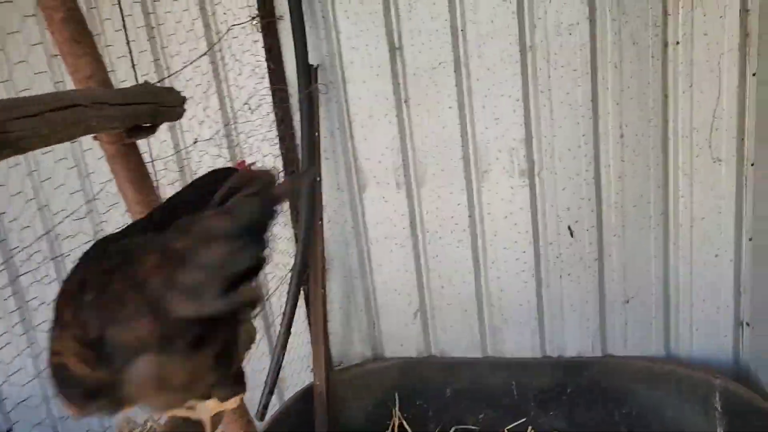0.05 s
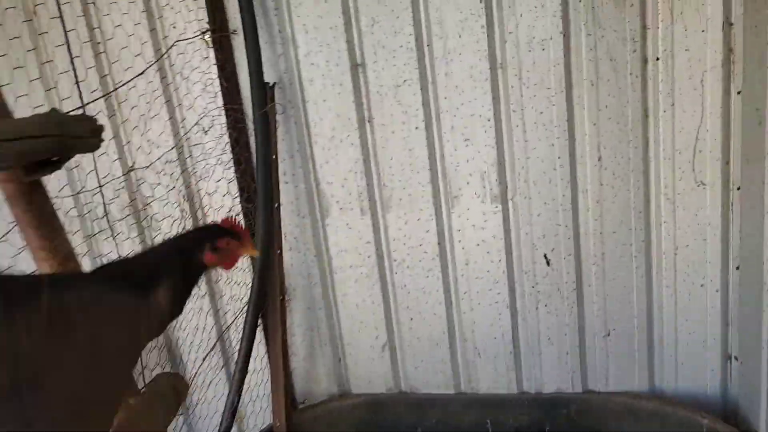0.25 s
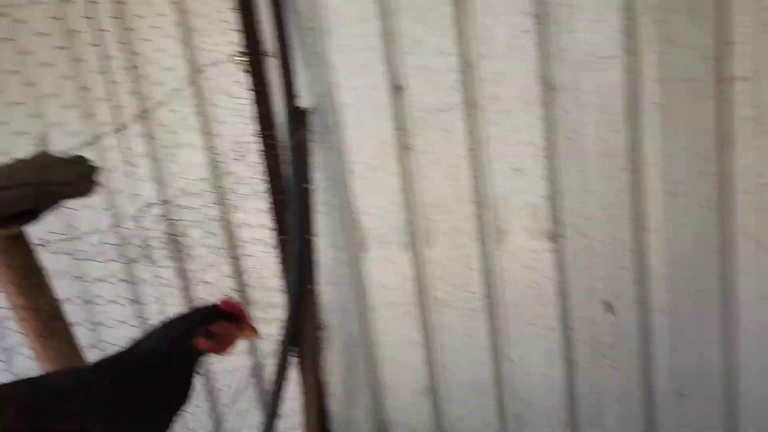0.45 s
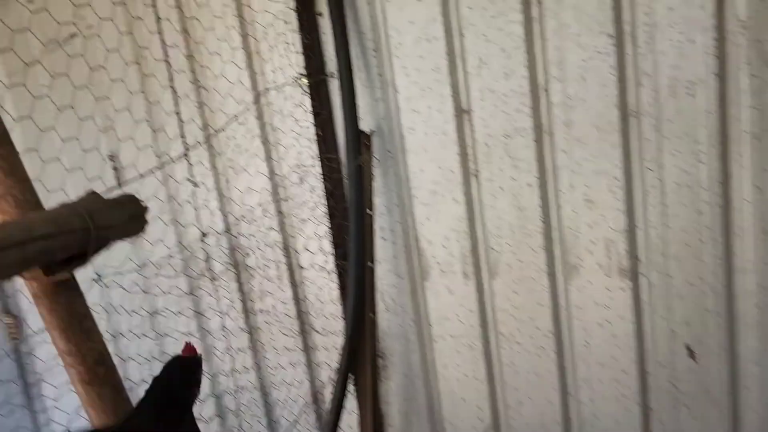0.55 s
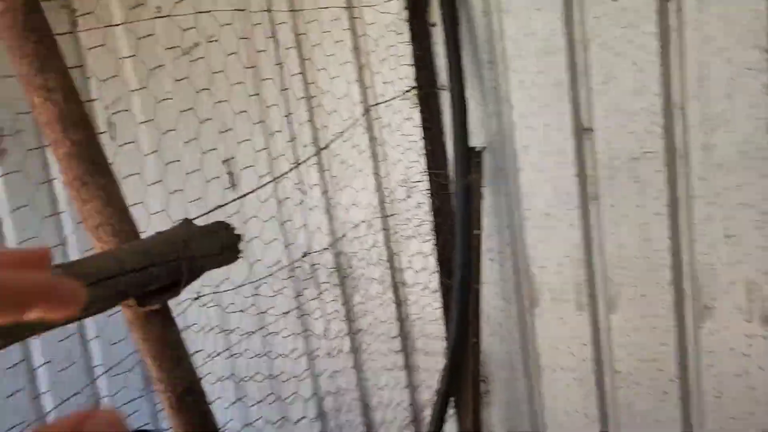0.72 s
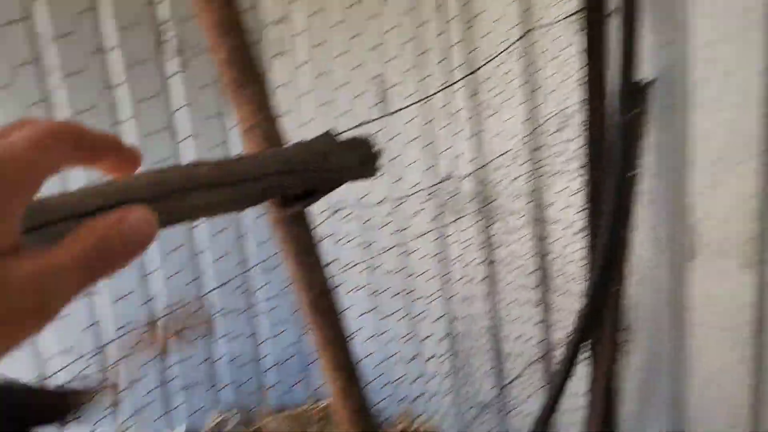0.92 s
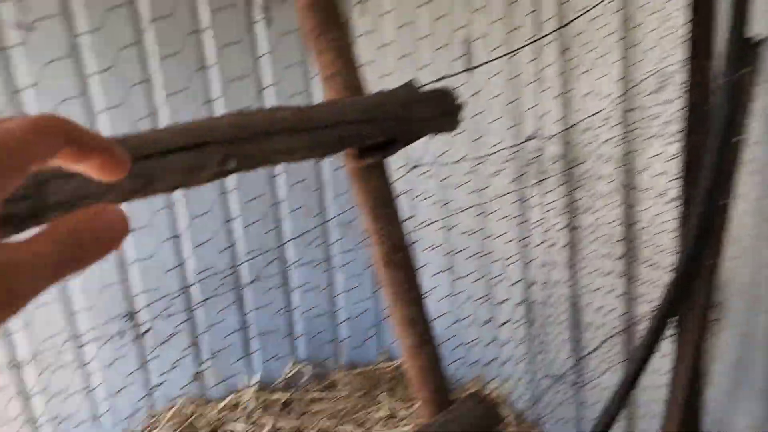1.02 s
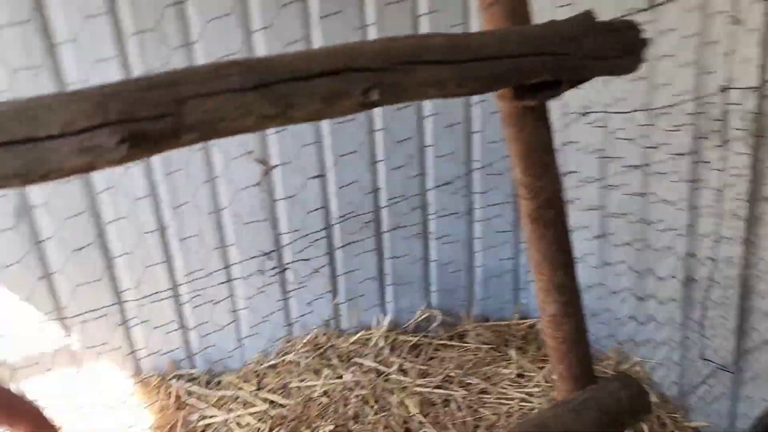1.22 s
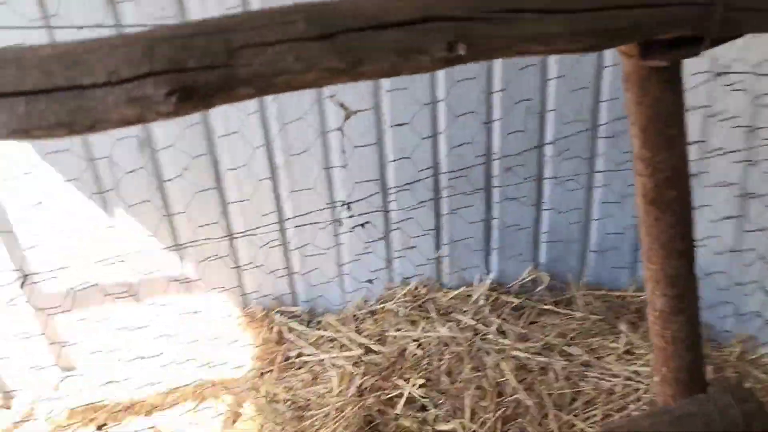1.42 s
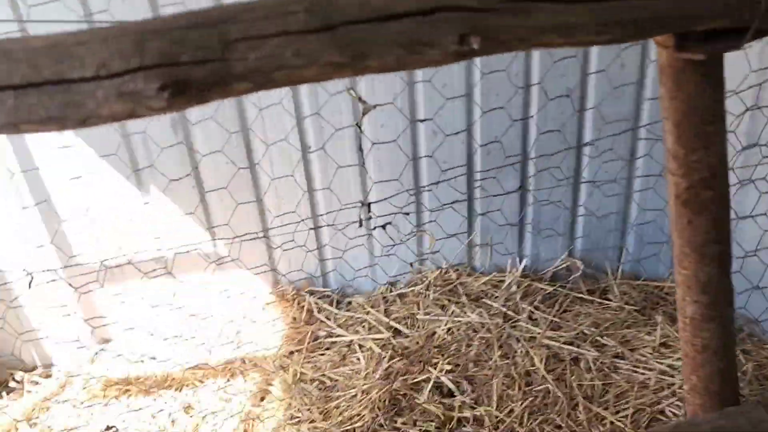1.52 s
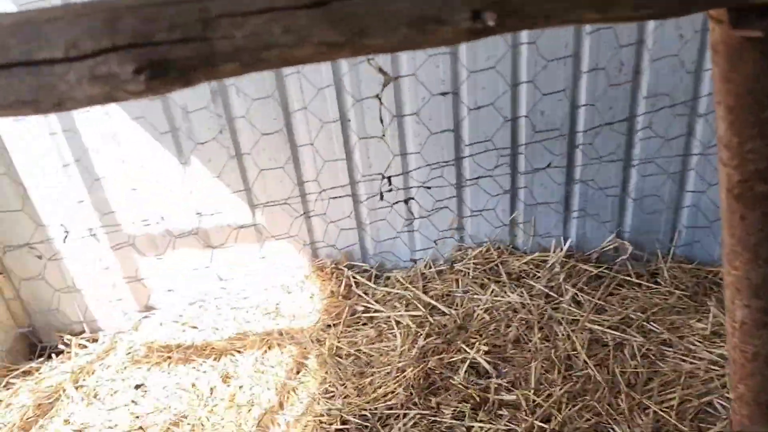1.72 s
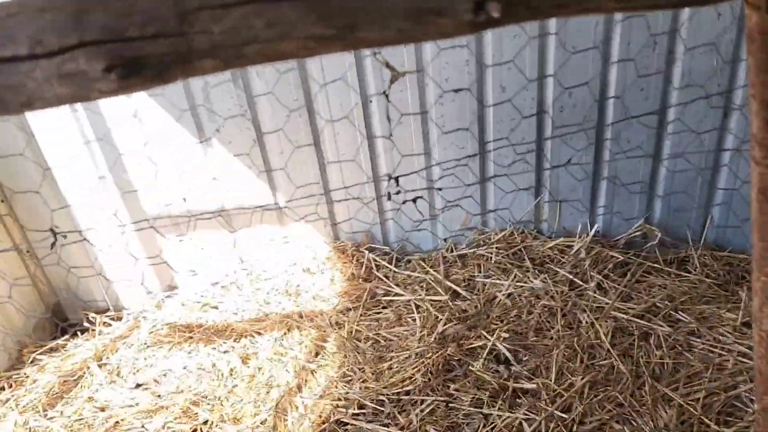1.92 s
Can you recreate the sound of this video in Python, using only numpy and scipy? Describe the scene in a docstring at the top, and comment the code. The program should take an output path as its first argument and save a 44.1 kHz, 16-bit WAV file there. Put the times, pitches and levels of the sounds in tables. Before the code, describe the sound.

A hen gives a faint whine, hoarse clucks from 0.2 seconds and one short squawk at 0.5. From 0.8 to 1.1 seconds she scuffles down with wing slaps, claw scratches, snapping stalks and a few knocks on a wooden perch, clucking twice more as it starts. Dry straw rustles throughout in the small metal pen, with low air and handling rumble on the close microphone, fading by 2 seconds.

```python
"""A thin whine, then hoarse clucks and one squawk: a hen is shooed off her straw nest in a small metal pen.
Her syrinx buzzes through throat and beak, and the sheet-metal walls add a short ring.
Straw and feathers rustle throughout, while moving air and handling rumble on the close microphone.
Her wings slap and her claws scratch in bursts of crackle as she jumps down on the left;
dry stalks snap and a knocked wooden perch rings."""
import sys
import numpy as np
from scipy import signal
from scipy.fft import rfft, irfft
from scipy.io import wavfile

SR = 44100
rng = np.random.default_rng(int(sys.argv[2]) if len(sys.argv) > 2 else 0)


def to_wav(s):
    """Save 16-bit WAV."""
    ch = np.atleast_2d(s).T  # columns
    pcm = np.round(np.clip(ch, -1, 1) * 32767)  # PCM
    wavfile.write(sys.argv[1], SR, pcm.astype(np.int16))


N = 85995
T = np.arange(N) / SR


def amp(db):
    """Decibels to gain."""
    return 10 ** (np.asarray(db) / 20)


def unit(x):
    """Scale to rms 1."""
    return x / np.sqrt(np.mean(x ** 2) + 1e-18)


def fader(points):
    """Gain that rides through (time [s], level [dB]) points."""
    return amp(np.interp(T, *np.array(points).T))


def colour(points, hz):
    """Gain at hz of an EQ curve drawn through (frequency [Hz], level [dB]) points."""
    f, db = np.array(points).T
    return amp(np.interp(np.log(np.maximum(hz, 1)), np.log(f), db))


def bell(hz, centre, width):
    """Bell of a resonance, 1 at its centre."""
    return 1 / (1 + ((hz - centre) / width) ** 2)


def eq(x, gain):
    """Minimum-phase filter from a function that gives gain by frequency."""
    size = 4096
    cepstrum = irfft(np.log(gain(np.fft.rfftfreq(size, 1 / SR)) + 1e-7))
    cepstrum[1:size // 2] *= 2
    cepstrum[size // 2 + 1:] = 0
    return signal.fftconvolve(x, irfft(np.exp(rfft(cepstrum))))[:N]


def wobble(rate_hz):
    """Random drift with rms 1."""
    return unit(np.interp(T * rate_hz, np.arange(N), rng.standard_normal(N)))


def grains(spread_db, grain_samples=14):
    """Dense crackle: tiny noise grains of uneven level."""
    noise = rng.standard_normal(N)
    gains = amp(spread_db * rng.standard_normal(N // grain_samples + 1))
    return unit(noise * np.repeat(gains, grain_samples)[:N])


def wide(make, side_db):
    """Stereo from one draw for the mid and another for the side."""
    return make() + amp(side_db) * make() * np.array([[1], [-1]])


def swell(start, length):
    """A half-sine rise and fall."""
    return np.sin(np.pi * np.clip((T - start) / length, 0, 1))


def hen():
    """The syrinx buzzes, unsteady and raspy when hoarse, through the throat and a beak resonance."""
    # (start [s], length [s], pitch [Hz], level [dB], roughness [0-1], beak resonance [Hz], its lift [dB])
    calls = [(-.04, .19, 489.4, -45.5, 0.1, 1000, 10.5), (0.203, 0.14, 492.4, -34.5, 0.4, 1070, 16),
             (0.27, 0.058, 504, -27.5, 0.87, 1360, 20), (0.309, 0.038, 502.3, -39, 0.73, 496, 22),
             (0.438, 0.072, 501, -30.5, 0.71, 1190, 15.5), (0.52, 0.032, 570.2, -14.5, 0.31, 1574, 11),
             (.742, 0.042, 456.6, -26.5, 0.14, 1710, -2), (.866, 0.061, 449, -23.5, 0.2, 1250, 25)]
    # throat formants (frequency [Hz], level [dB])
    throat = [(250, -35), (450, 0.5), (600, -0.5), (800, -0.5), (1150, -9), (1400, -1.5), (2100, 6.5),
              (3000, -8), (4500, -16), (8000, -45), (16000, -72)]
    arch, sag, jitter = .025, .018, .116  # shares of the pitch; jitter at full roughness
    beak_width_hz = 280
    out = np.zeros(N)
    for start, length, hz, db, rough, beak_hz, lift_db in calls:
        progress = np.clip((T - start) / length, 0, 1)
        bend = arch * (np.sin(np.pi * progress) - np.pi / 4) - sag * (progress - .5)
        pitch = hz * (1 + bend + jitter * rough * wobble(rate_hz=255.8))
        phase = 2 * np.pi * np.cumsum(pitch) / SR
        voiced = (progress > 0) & (progress < 1)
        buzz = np.zeros(N)
        buzz[voiced] = unit(np.cos(np.outer(phase[voiced], np.arange(1, 21))).sum(axis=1))
        rasp = 1.5 * rough * rng.standard_normal(N) * (1 + np.cos(phase))  # pulses with the buzz
        voice = (buzz + rasp) * swell(start, length)
        call = eq(voice, lambda f: colour(throat, f) * amp(lift_db * bell(f, beak_hz, beak_width_hz)))
        out += amp(db) * unit(call) * np.sqrt(length * SR / N)
    return np.array([out, out])


def pen(x, wet_db, t60_s):
    """Sound from the left reaches the left channel first; the metal walls add a short, dense ring."""
    left_lead_s, damping_hz = .00027, 10200
    late_right = np.pad(x[1], (int(left_lead_s * SR), 0))[:N]
    fade_in = np.clip(T / .00063 - .5, 0, 1)
    out = []
    for direct in (x[0], late_right):
        tail = rng.standard_normal(N) * amp(-60 * T / t60_s) * fade_in
        tail = eq(tail / np.linalg.norm(tail), lambda f: bell(f, 0, damping_hz))
        out.append(direct + amp(wet_db) * signal.fftconvolve(direct, tail)[:N])
    return np.array(out)


def straw():
    """Straw crunches and feathers swish, fluttering a little; a few stalks slide and squeak."""
    # tone of the rustle (frequency [Hz], level [dB])
    tone = [(300, -31), (700, 0), (2300, 2.5), (5000, 0.5), (6200, -3.5), (8000, 0.5), (9800, -9),
            (11700, 1.5), (13000, -6.5), (16000, -11)]
    # crunch below the crossover (time [s], relative level [dB])
    crunch_ride = [(0, -55), (.3, -38), (.63, -56), (.8, -37.5), (1.15, -42.5), (1.35, -41.5),
                   (1.65, -49.5), (1.95, -54.5)]
    # swish above the crossover (time [s], relative level [dB])
    swish_ride = [(0, -54), (.11, -53.5), (.23, -36), (.35, -42.5), (.43, -39.5), (.47, -49.5), (.62, -50),
                  (.76, -43), (.8, -43), (.97, -33.5), (1.08, -45.5), (1.32, -40), (1.38, -51),
                  (1.455, -51.5), (1.49, -42), (1.55, -47), (1.73, -48), (1.8, -57.5), (1.95, -50.5)]
    # sliding stalks (start [s], length [s], squeak centre [Hz], level [dB])
    slides = [(1.288, 0.019, 8260, -30.5), (1.302, 0.089, 2450, -37.5), (1.789, 0.026, 5240, -48)]
    crossover_hz, flutter_db = 3840, .8

    def crackle(gain):
        return wide(lambda: eq(grains(spread_db=3), gain), side_db=1.0)

    def lows(f):
        return 1 / np.sqrt(1 + (f / crossover_hz) ** 10)

    crunch = crackle(lambda f: colour(tone, f) * lows(f)) * fader(crunch_ride)
    swish = crackle(lambda f: colour(tone, f) * np.sqrt(1 - lows(f) ** 2)) * fader(swish_ride)
    out = 2 * (crunch + swish) * amp(flutter_db * wobble(rate_hz=43.7))
    for start, length, hz, db in slides:
        out += amp(db) * swell(start, length) * unit(crackle(lambda f: bell(f, hz, width=850)))
    return out


def microphone_rumble():
    """Air buffets the microphone and the hand rubs on its case."""
    # buffeting air (frequency [Hz], level [dB])
    air_tone = [(20, -26), (38, 2), (60, 3.5), (90, -0.5), (116, 5.5), (150, -8), (250, -17), (4000, -100)]
    # its rise and fall (time [s], level [dB])
    air_ride = [(0, -53), (.18, -55), (.23, -37.5), (.42, -35), (.57, -33), (.68, -41.5), (.9, -25.5),
                (1.1, -34), (1.45, -31.5), (1.6, -34), (1.95, -38.5)]
    # rubbed case (frequency [Hz], level [dB])
    case_tone = [(60, -9), (160, -0.5), (205, 3), (245, -2), (290, 1), (450, -1), (600, -7.5), (800, -14),
                 (1500, -34), (5000, -30)]
    # its rise and fall (time [s], level [dB])
    hand_ride = [(0, -50), (.19, -55), (.25, -47), (.74, -44.5), (.8, -35), (.97, -36.5), (1.08, -36.5),
                 (1.42, -36.5), (1.55, -40.5), (1.95, -48)]
    # puffs of air from wings and hand (start [s], length [s], pitch [Hz], level [dB])
    puffs = [(.789, .014, 164, -27.5), (0.812, 0.033, 88, -25.5), (0.947, 0.015, 66, -13),
             (1.122, 0.032, 107, -25), (1.355, 0.034, 51.7, -24.5), (1.397, 0.054, 50, -26.5)]

    def noise(tone):
        return unit(eq(rng.standard_normal(N), lambda f: colour(tone, f)))

    air = wide(lambda: noise(air_tone), side_db=-29.5) * fader(air_ride)
    hand = wide(lambda: noise(case_tone), side_db=-9.5) * fader(hand_ride)
    for start, length, hz, db in puffs:
        air += amp(db) * swell(start, length) * np.sin(2 * np.pi * hz * (T - start))
    return air + hand


def wings_and_claws():
    """Each wing slap or claw scratch is a sudden burst of crackle that dies away."""
    # slaps and scratches (start [s], relative level [dB], decay [s], bright peak [Hz], its lift [dB])
    scuffs = [(0.208, -31, 0.015, 4730, 4), (0.5165, -28.5, 0.022, 4700, 1),
              (0.793, -29.5, 0.037, 4270, 3.5), (0.87, -23, 0.01, 12050, 12.5),
              (0.8989, -23, 0.0096, 2950, 12), (.909, -28.5, 0.0054, 7360, 9),
              (0.95, -18, 0.015, 11900, 14), (0.952, -18.5, 0.0053, 4190, 9.5),
              (0.958, -44, 0.0048, 12350, 5), (0.968, -30, 0.019, 4260, -21), (1.06, -30, 0.017, 4350, -1),
              (1.121, -33.5, 0.0072, 1200, 12)]
    # their common tone (frequency [Hz], level [dB])
    tone = [(100, -2), (400, 6), (750, -0.5), (2000, 6.5), (4000, 0.5), (6200, 6), (8000, -1.5),
            (10000, 1.5), (11700, -5.5), (13000, -8), (16000, -10)]
    attack_s, spike_s, spike_db, right_over_left_db = .00036, .0011, -2.5, 1.5
    out = np.zeros(N)
    for start, db, decay, hz, lift_db in scuffs:
        age = np.maximum(T - start, 0)
        spike = amp(spike_db) * np.exp(-age / spike_s)
        envelope = np.minimum(age / attack_s, 1) * (np.exp(-age / decay) + spike)
        crackle = grains(spread_db=4) * envelope
        burst = eq(crackle, lambda f: colour(tone, f) * amp(lift_db * bell(f, hz, hz * .072)))
        out += 2.062 * amp(db) * unit(burst) * np.sqrt(np.mean(envelope ** 2))
    return out * amp(np.array([[-.5], [.5]]) * right_over_left_db)


def stalk_snaps():
    """A dry stalk cracks and rings for a moment."""
    # breaking stalks (start [s], level [dB], ring [Hz], decay [s])
    snaps = [(0.3805, -16.5, 5370, 0.0012), (0.8077, -6, 4710, 0.0015), (1.0265, -13.5, 4970, 0.00085)]
    out = np.zeros(N)
    for start, db, hz, decay in snaps:
        age = np.maximum(T - start, 0)
        crack = np.sin(2 * np.pi * hz * age) + rng.standard_normal(N) / 2
        out += amp(db) * crack * (age > 0) * np.exp(-age / decay)
    return np.array([out, out])


def perch():
    """Each knock rings the same damped wooden modes, in a slightly different mix."""
    # knocks on the perch (start [s], relative level [dB])
    knocks = [(0.901, -21), (.951, -21), (0.977, -22.5), (1.1199, -17.5)]
    # modes of the wood (frequency [Hz], relative level [dB], time to fall 60 dB [s])
    modes = [(297.4, -3, 0.22), (363, 0.5, 0.16), (443, -4, 0.21), (528, -0.5, 0.13), (619, -6, 0.11),
             (744, -7, 0.069), (985, -9, 0.057), (1473, -5, 0.032)]
    out = np.zeros(N)
    for start, db in knocks:
        age = np.maximum(T - start, 0)
        for k, (hz, mode_db, t60) in enumerate(modes):
            polarity = (-1) ** (k // 2)
            envelope = amp(db + mode_db + rng.standard_normal() - 60 * age / t60)
            out += polarity * envelope * np.sin(2 * np.pi * hz * age) / 2
    return np.array([out, out])


def scene():
    """The hen and her scuffle in the pen, over straw and rumble."""
    voice = pen(hen(), wet_db=-4, t60_s=.14)
    scuffle = pen(wings_and_claws() + stalk_snaps() + perch(), wet_db=-4, t60_s=.11)
    return voice + scuffle + straw() + microphone_rumble()


def record(dry):
    """The recorder clips at full scale and cuts the top steeply."""
    top_hz = 16000
    high_cut = signal.ellip(12, .2, 80, top_hz, fs=SR, output="sos")
    return signal.sosfilt(high_cut, np.clip(dry, -1, 1))


dry = scene()
out = record(dry)
to_wav(out)
```